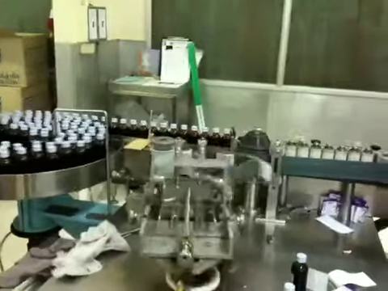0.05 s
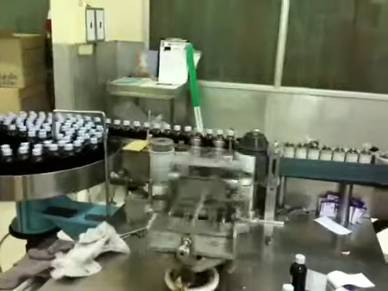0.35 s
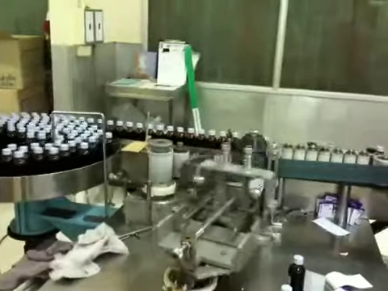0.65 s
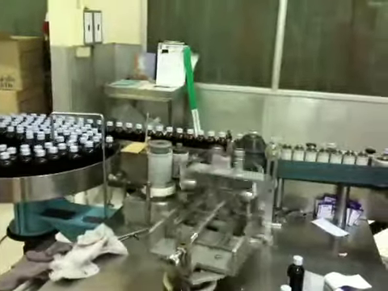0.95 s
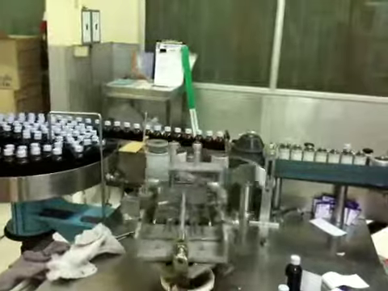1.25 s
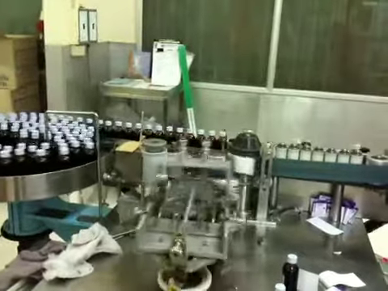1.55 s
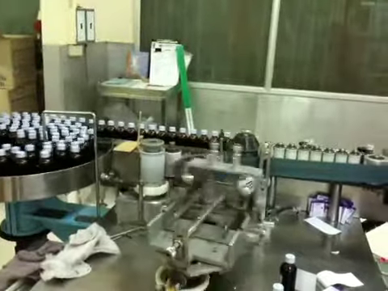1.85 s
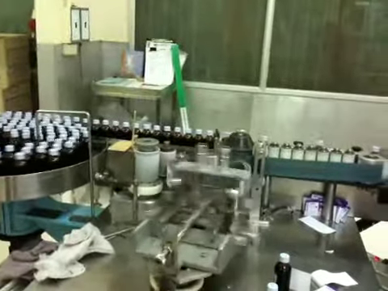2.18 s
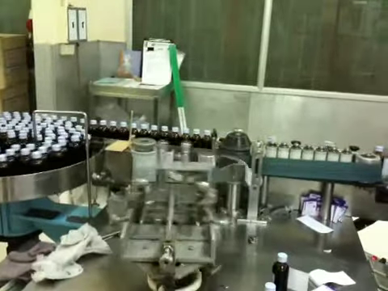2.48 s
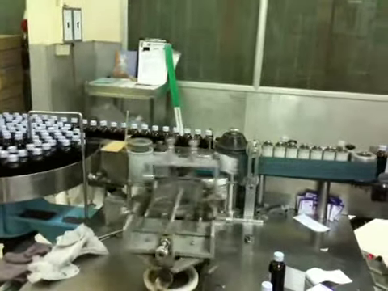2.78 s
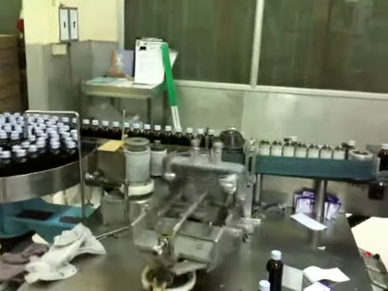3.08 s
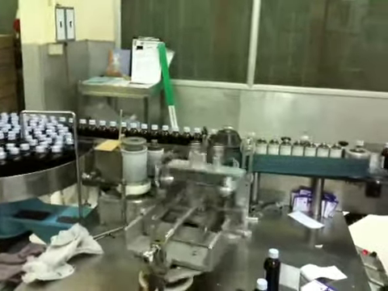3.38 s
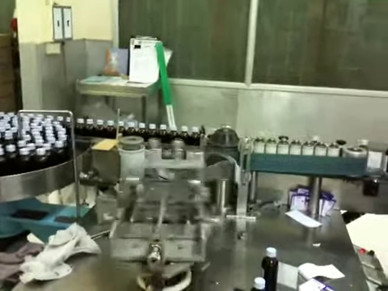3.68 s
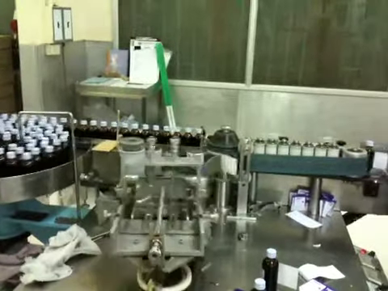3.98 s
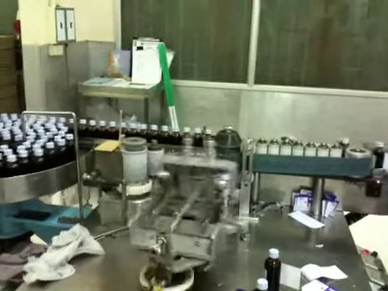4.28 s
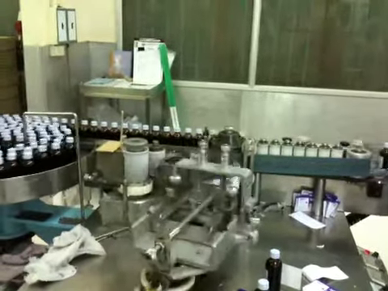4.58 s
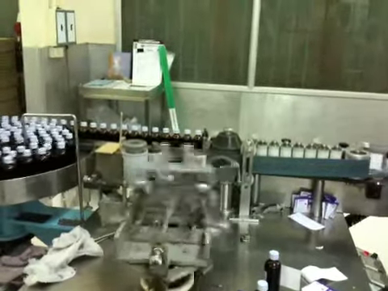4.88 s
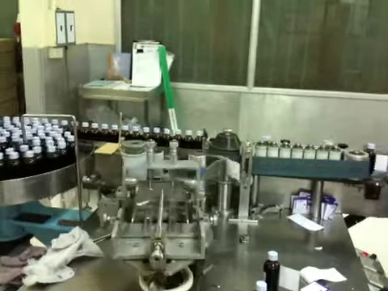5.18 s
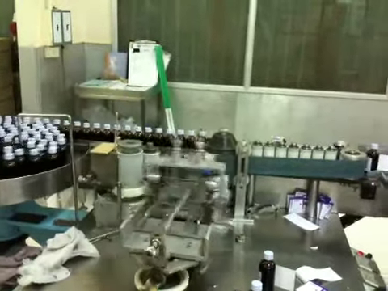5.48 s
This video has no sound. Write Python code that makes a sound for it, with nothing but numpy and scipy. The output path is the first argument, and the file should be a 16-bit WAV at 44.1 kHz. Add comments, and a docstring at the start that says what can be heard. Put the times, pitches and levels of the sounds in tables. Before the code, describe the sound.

A bottle filling line runs close by in a hard-walled factory room. Small glass bottles chatter in bright, high-pitched surges and scrape along the guide rails, with single sharp clinks on top. Underneath, air hisses, the conveyor chain rattles, motors hum and the steel frame rumbles. Early on, a valve vents once with a thump, then the clinking and clatter carry on to the end.

```python
"""Small glass bottles chatter along the conveyors of a filling line in a hard-walled factory room.
Two queues ring in two clusters of pitches as the belt bunches and shoves them, scraping the guide
rails, and single hard clinks stick out on top. Underneath, the chain rattles, air hisses, motors
hum and working strokes rumble through the steel frame. A valve vents once, with a thump."""
import sys
import numpy as np
from scipy import signal
from scipy.fft import rfft, irfft
from scipy.io import wavfile
from scipy.ndimage import uniform_filter1d

SR = 44100
rng = np.random.default_rng(int(sys.argv[2]) if len(sys.argv) > 2 else 0)


def persist_wave(psi):
    """Save psi, clipped to +-1, as 16-bit WAV."""
    counts = np.round(np.clip(psi, -1, 1) * 32767).astype(np.int16)
    wavfile.write(sys.argv[1], SR, np.atleast_2d(counts).T)


N = 244314
T = np.arange(N) / SR

# EQ curves for the noise layers. Each row: frequency in Hz, relative level in dB.
DRONE_EQ = [(25, -26), (70, -46), (105, -7.5), (150, -3.5), (260, 3), (400, -7), (1000, -27)]  # low drone of the drives
AIR_EQ = [(300, -38), (1500, -12.5), (3000, -2), (4500, 2.5), (6300, 1.5), (8000, -1), (9800, -3.5),
          (11000, -9.5), (12300, -18), (13800, -17.5), (15500, -29)]  # bright air hiss
CHAIN_EQ = [(40, -60), (150, -65), (500, -9.5), (850, -4), (1300, 0), (1700, -0.5), (2100, -0.5),
            (2800, -1.5), (5000, -18.5), (12000, -50)]  # midrange clatter of the slats
FRAME_EQ = [(25, -26), (60, -45), (100, -34), (150, -19), (210, -3), (320, 2.5), (480, 2), (780, 1),
            (1100, -3.5), (2500, -24), (8000, -53)]  # body of the steel frame
JET_EQ = [(30, -16), (100, -31), (200, -0.5), (400, -6.5), (1500, -5), (2800, -7), (4200, 1), (6300, 0.5),
          (8500, -3.5), (11500, -9), (15000, -31)]  # the valve's air burst
RATTLE_EQ = [(100, -65), (1000, -35), (2700, -11), (3500, 0), (4500, -6.5), (6500, -2), (10000, -25)]  # the valve's metal rattle
SCRAPE_EQ = [(300, -58), (1200, -20), (2100, -11), (3000, -2.5), (3700, 3.5), (4700, -5.5), (6000, -15),
             (9500, -15), (12000, -50)]  # glass on the guide rails
SIZZLE_EQ = [(500, -85), (5000, -37), (8000, -5), (9600, 3), (10600, -10.5), (12000, -28), (15000, -42)]  # top end of sliding glass
RAIL_EQ = [(200, -50), (800, -16), (1280, 0), (1700, -9), (3000, -30), (8000, -55)]  # resonance of the rails

# Motor and gear tones. Each row: pitch in Hz, level in dB.
MOTOR_TONES = [(100, -62.5), (425, -51.5), (501, -54), (646, -49)]
# Knocks on the frame. Each row: start in seconds, pitch in Hz, level in dB.
FRAME_KNOCKS = [(0.381, 398, -22), (0.696, 168, -29), (.72, 227, -18), (.745, 205, -33), (0.871, 231, -24),
                (3.315, 252, -21)]
# Fader moves of the running line. Each row: time in seconds, air fader in dB, chain fader in dB.
LINE_FADERS = [(0, -26.5, -28.5), (.25, -27, -31.5), (.6, -26, -29), (1.2, -27, -28), (1.97, -26, -30),
               (2.12, -32.5, -31.5), (2.35, -30, -28.5), (2.82, -34, -27.3), (3.0, -36, -31),
               (3.5, -25.5, -26), (3.82, -40.5, -34.5), (3.96, -38, -32.5), (4.22, -43, -38),
               (4.31, -34.5, -30.5), (4.76, -35, -30.5), (4.92, -28.5, -30.5), (5.18, -31.5, -30.5),
               (5.54, -35.5, -31.5)]
# Strokes that shake the frame. Each row: start in seconds, length in seconds, relative level in dB.
WORK_STROKES = [(.29, .22, -32.5), (.63, .24, -32), (1.67, .56, -35), (3.23, .29, -23), (4.27, .32, -39.5),
                (5.03, .18, -31)]
# Single bottles colliding. Each row: start in seconds, ring pitch in Hz, relative level in dB.
BOTTLE_KNOCKS = [(0.056, 5720, -14), (.265, 5780, -14), (.327, 5750, -14), (.898, 5940, -13),
                 (1.024, 5830, -15), (1.229, 5650, -14), (1.406, 5730, -11), (1.455, 5650, -16),
                 (1.52, 8600, -15), (1.568, 8420, -6), (1.586, 8580, -15), (1.733, 5860, -2),
                 (1.754, 5710, -8), (1.774, 5910, -11), (1.796, 5790, -8), (1.972, 5800, -8),
                 (2.144, 5820, -21), (2.258, 8550, -12), (2.322, 8800, -14), (2.517, 8450, -14),
                 (2.658, 5840, -12.5), (2.772, 5720, -12), (2.896, 5720, -16), (3.074, 5840, -15),
                 (3.141, 5850, -16), (3.263, 5920, -8.5), (3.275, 8530, -13), (3.333, 8560, -5),
                 (3.359, 8500, -6), (3.456, 5950, -10), (3.548, 6000, -12), (3.968, 5860, -16),
                 (4.188, 5730, -16), (4.277, 5780, -17), (4.358, 5730, -16), (4.375, 5850, -10),
                 (4.662, 5930, -13.5), (4.924, 5930, -14), (5.088, 8520, -22), (5.117, 8580, -12),
                 (5.139, 8350, -10), (5.317, 5880, -8.5), (5.344, 5870, -7.5), (5.374, 5860, -13)]
# Ring pitches in Hz of the bottles in each queue.
LOW_RINGS_HZ = [5720, 5784, 5810, 5960, 5930]
HIGH_RINGS_HZ = [8330, 8530, 8460, 8660, 8710, 8590]
# The low queue bunching up. Each row: start in seconds, length in seconds, relative level in dB.
LOW_JOSTLES = [(0.0, 0.043, -19.5), (.68, .2, -31), (1.2, .07, -31), (1.37, .43, -26), (1.92, .08, -22.5),
               (2.74, 0.12, -26), (3.06, 0.23, -24), (3.36, 0.23, -24), (4.08, 0.17, -29),
               (4.26, .06, -24.5), (4.34, .07, -22.5), (4.5, .05, -27), (4.85, 0.064, -23),
               (5.04, 0.15, -22), (5.28, .16, -21)]
# Shoves through the high queue. Each row: start in seconds, length in seconds, then the relative
# levels in dB of ring, rail scrape and sizzle.
HIGH_SHOVES = [(0.908, 0.044, -25, -31, -44), (1.497, .07, -16.5, -24.5, -25), (1.92, 0.054, -42, -27, -41),
               (2.168, .06, -23.5, -42, -27), (2.216, 0.094, -21, -20.5, -24),
               (2.468, .08, -19, -21.5, -24), (2.67, 0.054, -23, -29, -40), (2.788, 0.056, -27, -20.5, -27),
               (3.27, 0.1, -17, -21.5, -34), (4.447, 0.054, -31.5, -50, -47),
               (5.032, 0.094, -16.5, -21, -38), (5.291, 0.09, -20.5, -26, -46), (5.45, .05, -30, -38, -48)]

SHOVE_ATTACK_S, SCRAPE_T60_S = 0.052, 0.71


def undb(db):
    """Decibels to gain."""
    return 10 ** (np.asarray(db) / 20)


def unit(x):
    """Scale to rms 1."""
    return x / np.sqrt(np.mean(x ** 2))


def gains(table):
    """The dB columns of a fader table as gains at every sample."""
    times, *columns = np.transpose(table)
    return [undb(np.interp(T, times, db)) for db in columns]


def colour(x, eq):
    """Shape a sound with an EQ curve; rms 1."""
    hz, db = np.transpose(eq)
    bins_hz = np.maximum(np.arange(N // 2 + 1) * SR / N, 1)
    curve = undb(np.interp(np.log(bins_hz), np.log(hz), db))
    return unit(irfft(rfft(x) * curve, N))


def wander(rate):
    """Smooth random drift, rate turns a second; rms 1."""
    step = max(int(SR / rate), 1)
    stairs = np.repeat(rng.standard_normal(N // step + 1), step)
    return unit(uniform_filter1d(stairs, step)[:N])


def impacts(rate, spread_db):
    """Random contacts, rate a second, with sizes scattered in dB; rms 1."""
    hit = rng.random(N) < rate / SR
    size = undb(spread_db * np.clip(rng.standard_normal(N), -2, 2))
    return unit(hit * size * np.sign(rng.standard_normal(N)))


def fade(t, t60):
    """Exponential decay from t = 0, falling 60 dB in t60 seconds."""
    return (t >= 0) * np.exp(-np.log(1000) * np.maximum(t, 0) / t60)


def swells(events, attack_s, t60, rest_db=-np.inf):
    """Envelope over a resting level: each event rises, holds to its length and dies away."""
    power = undb(rest_db) ** 2
    for start, length, db in events:
        rise = np.clip((T - start) / attack_s, 0, 1)
        release = fade(np.maximum(T - start - length, 0), t60)
        power = power + (undb(db) * rise * release) ** 2
    return np.sqrt(power)


def ring(x, hz, t60):
    """One damped mode driven by x."""
    pole = np.exp((2j * np.pi * hz - np.log(1000) / t60) / SR)
    return signal.lfilter([1], [1, -pole], x).imag


def add(out, start_s, sound):
    """Drop a short sound onto the track."""
    i = int(start_s * SR)
    out[i:i + len(sound)] += sound[:N - i]


def room(x, wet_db, t60=0.36, gap_s=0.0031):
    """Walls and steel panels return a dense tail after a short gap."""
    tail = rng.standard_normal(SR) * fade(T[:SR] - gap_s, t60)
    return x + undb(wet_db) * signal.fftconvolve(x, tail / np.linalg.norm(tail))[:N]


def motors(waver=0.00391, flutter_db=1.0, drone_db=-42):
    """Tones that waver with the load, over the even drone of the drives."""
    tones = np.zeros(N)
    for hz, db in MOTOR_TONES:
        level = undb(db - flutter_db * wander(7.9))
        pitch = hz * (1 + waver * wander(9))
        tones += level * unit(np.sin(2 * np.pi * np.cumsum(pitch) / SR))
    return tones + undb(drone_db) * colour(rng.standard_normal(N), DRONE_EQ)


def thumps(t60=0.1, attack_s=0.0063):
    """Dull knocks that set a panel of the frame swinging."""
    out, t = np.zeros(N), T[:SR // 2]
    envelope = fade(t, t60) * (1 - np.exp(-t / attack_s))
    for start, hz, db in FRAME_KNOCKS:
        add(out, start, undb(db) * np.sin(2 * np.pi * hz * t) * envelope)
    return out


def machine(idle_db=-38, stroke_air_db=-6, stroke_chain_db=-5, shove_air_db=-10):
    """Air hisses, chain slats clatter and dense knocks shake the frame; all swell on each stroke."""
    air, chain = gains(LINE_FADERS)
    stroke = swells(WORK_STROKES, attack_s=0.14, t60=0.95)
    start, length, _, scrape_db, _ = np.transpose(HIGH_SHOVES)
    shove = swells(zip(start, length, scrape_db), SHOVE_ATTACK_S, SCRAPE_T60_S)
    air = np.sqrt(air ** 2 + (undb(stroke_air_db) * stroke) ** 2 + (undb(shove_air_db) * shove) ** 2)
    chain = np.hypot(chain, undb(stroke_chain_db) * stroke)
    frame = np.hypot(undb(idle_db), stroke)
    hiss = colour(rng.standard_normal(N), AIR_EQ) * undb(0.99 * wander(25.03))
    slats = colour(impacts(rate=6000, spread_db=4.5), CHAIN_EQ) * undb(0.6 * wander(22))
    rumble = colour(impacts(rate=2500, spread_db=3.5), FRAME_EQ) * undb(0.5 * wander(16))
    return undb(6.0) * air * hiss + undb(1.84) * chain * slats + undb(-0.55) * frame * rumble


def valve(start_s=0.738, opening_s=0.0018, hold_s=0.024, jet_db=-11, rattle_db=-12.5):
    """A valve snaps open with a metal rattle; air bursts out, holds and dies as the pressure falls."""
    out, t = np.zeros(N), T[:SR // 2]
    opening = 1 - np.exp(-t / opening_s)
    pressure = fade(np.maximum(t - hold_s, 0), t60=0.45)
    jet = colour(rng.standard_normal(N), JET_EQ)[:len(t)] * pressure
    rattle = colour(impacts(rate=1100, spread_db=1), RATTLE_EQ)[:len(t)] * fade(t, t60=0.3)
    add(out, start_s, opening * (undb(jet_db) * jet + undb(rattle_db) * rattle))
    return out


def clinks(ring_t60=0.085, detune_hz=45, twin_db=-8, tick_db=-14, tick_t60=0.014, contact_s=0.00058):
    """A hard knock: a tick of contact, then both bottles ring, a little apart in pitch."""
    out, t = np.zeros(N), T[:SR // 4]
    glassy = signal.butter(2, [2800, 9000], "band", fs=SR, output="sos")
    attack = 1 - np.exp(-t / contact_s)
    for start, hz, db in BOTTLE_KNOCKS:
        tone = np.sin(2 * np.pi * hz * t) + undb(twin_db) * np.sin(2 * np.pi * (hz - detune_hz) * t)
        tick = undb(tick_db) * signal.sosfilt(glassy, rng.standard_normal(len(t))) * fade(t, tick_t60)
        add(out, start, undb(db) * (tone * fade(t, ring_t60) + tick) * attack)
    return undb(-3) * out


def queue(pitches, rate, spread_db, t60, pinched_hz, pinched_t60, pinched_db):
    """Each bottle rings at its own pitch when bumped; those pinched in the row only tick."""
    free = unit(sum(ring(impacts(rate, spread_db), hz, t60) for hz in pitches))
    pinched = unit(ring(impacts(rate * len(pitches), spread_db), pinched_hz, pinched_t60))
    glass = free + undb(pinched_db) * pinched
    # small bottles radiate little below their ring
    low_cut = signal.butter(2, 4000, "high", fs=SR, output="sos")
    return unit(signal.sosfilt(low_cut, glass))


def bottles(chatter_db=1, unrest_db=1.05, drag_db=-3, rail_db=-8):
    """Two queues chatter as the belt pushes them; their sides scrape the guide rails, which ring."""
    _, chain = gains(LINE_FADERS)
    start, length, ring_db, scrape_db, sizzle_db = np.transpose(HIGH_SHOVES)
    # the belt creeping underneath keeps the bottles ticking and rubbing between shoves
    creep = chain * undb(chatter_db + unrest_db * wander(12))
    low_level = np.hypot(swells(LOW_JOSTLES, attack_s=0.028, t60=0.56), creep)
    high_level = swells(zip(start, length, ring_db), SHOVE_ATTACK_S, t60=0.74, rest_db=-44)
    push = swells(zip(start, length, scrape_db), SHOVE_ATTACK_S, SCRAPE_T60_S, rest_db=-42)
    slip = swells(zip(start, length, sizzle_db), SHOVE_ATTACK_S, SCRAPE_T60_S)
    rub = np.hypot(push, undb(drag_db) * chain)
    low_queue = queue(LOW_RINGS_HZ, rate=75, spread_db=2.0, t60=0.09,
                      pinched_hz=6020, pinched_t60=0.0052, pinched_db=-6)
    high_queue = queue(HIGH_RINGS_HZ, rate=260, spread_db=0.5, t60=0.044,
                       pinched_hz=8710, pinched_t60=0.015, pinched_db=-13.5)
    chatter = undb(-0.43) * low_level * low_queue + undb(1.4) * high_level * high_queue
    scrape = colour(impacts(rate=6000, spread_db=2.5), SCRAPE_EQ)
    sizzle = colour(impacts(rate=9000, spread_db=4.0), SIZZLE_EQ)
    rail = undb(rail_db) * colour(impacts(rate=5000, spread_db=2.5), RAIL_EQ)
    return chatter + rub * scrape + slip * sizzle + push * rail


def scene():
    """The running line sits close and single knocks ring out into the room, all in dual mono."""
    running = room(bottles() + machine() + valve(), wet_db=-14)
    knocks = room(clinks() + thumps(), wet_db=-7)
    line = running + knocks + motors()
    return np.array([line, line])


def record(dry, ceiling=0.88, low_cut_hz=62, high_cut_hz=15700):
    """Master chain: thin the bass, round off the loudest peaks and cut the top."""
    thin = signal.sosfilt(signal.butter(2, low_cut_hz, "high", fs=SR, output="sos"), dry)
    rounded = thin / (1 + (thin / ceiling) ** 4) ** (1 / 4)
    return signal.sosfilt(signal.ellip(10, 0.2, 80, high_cut_hz, fs=SR, output="sos"), rounded)


dry = scene()
out = record(dry)
persist_wave(out)
```